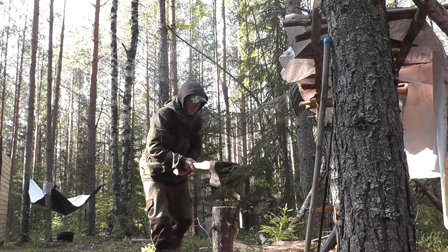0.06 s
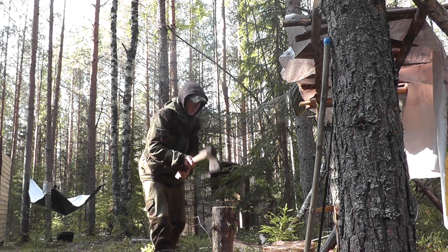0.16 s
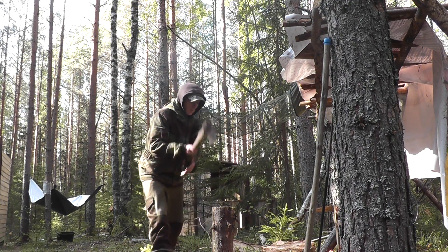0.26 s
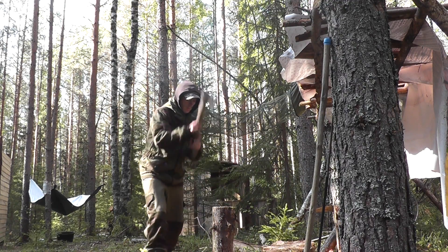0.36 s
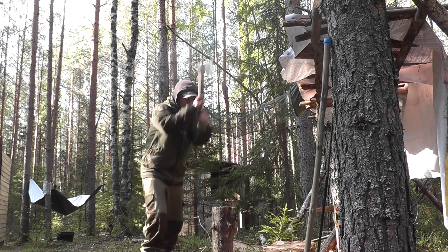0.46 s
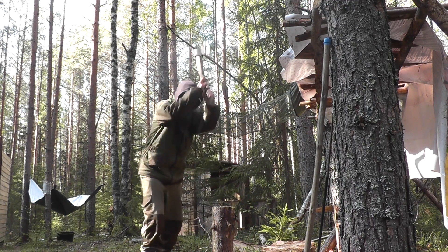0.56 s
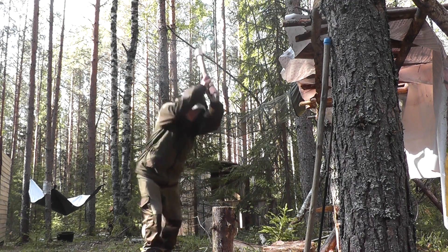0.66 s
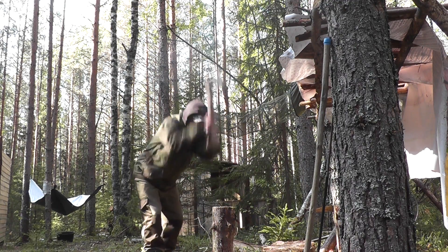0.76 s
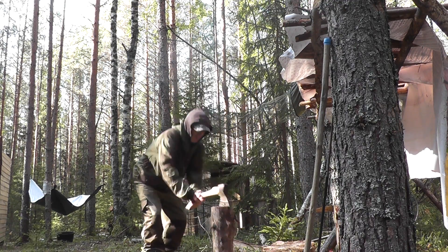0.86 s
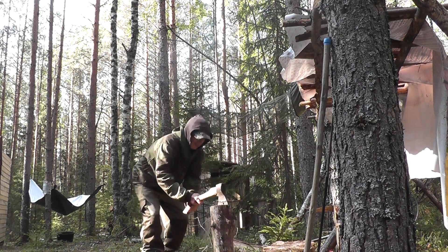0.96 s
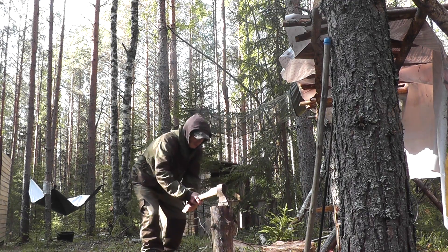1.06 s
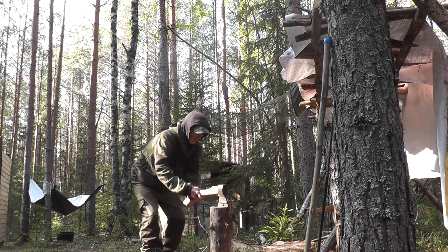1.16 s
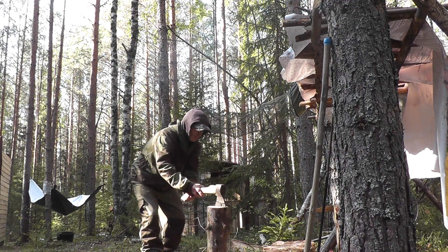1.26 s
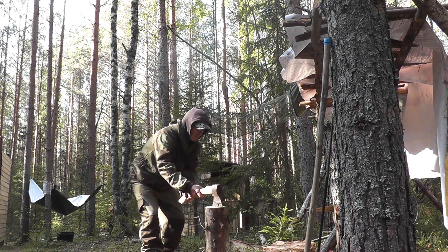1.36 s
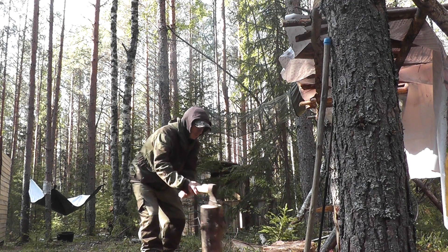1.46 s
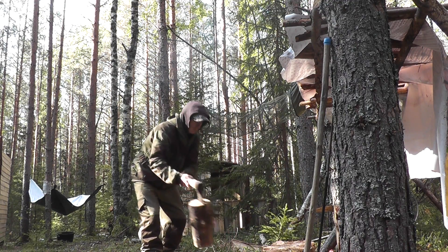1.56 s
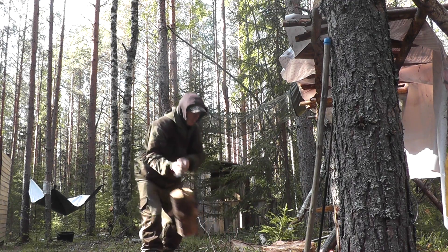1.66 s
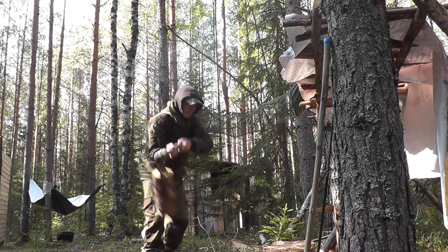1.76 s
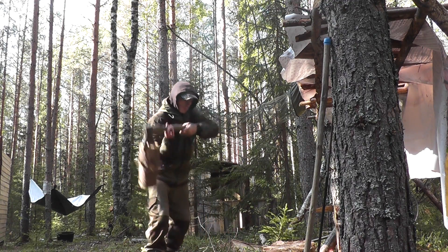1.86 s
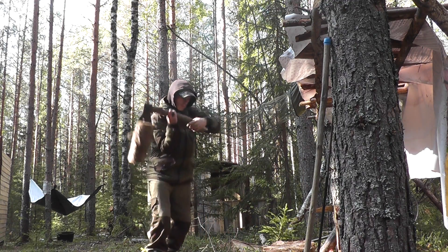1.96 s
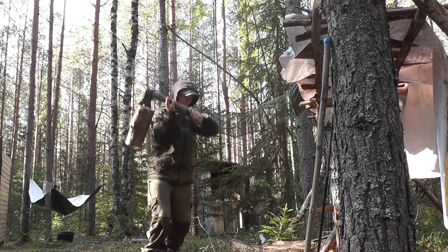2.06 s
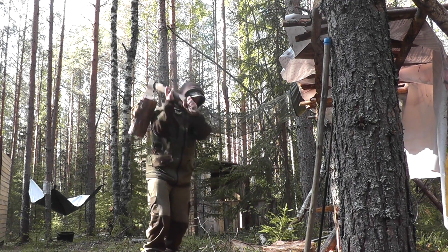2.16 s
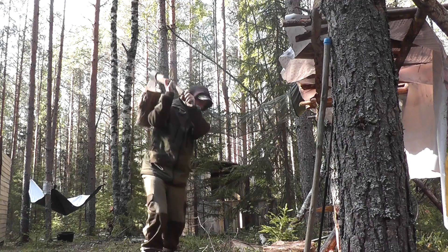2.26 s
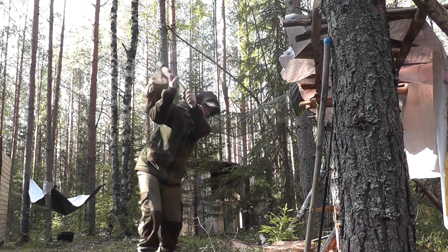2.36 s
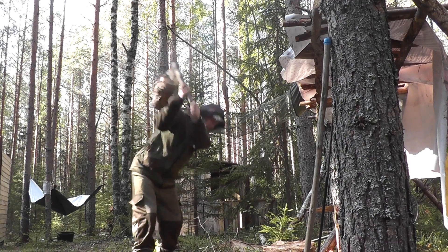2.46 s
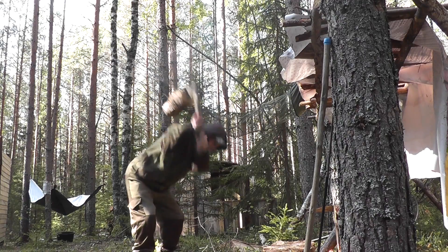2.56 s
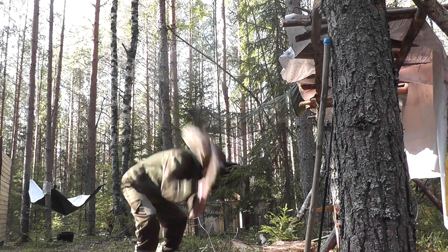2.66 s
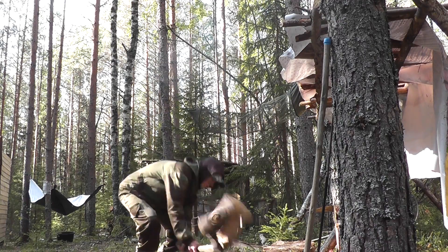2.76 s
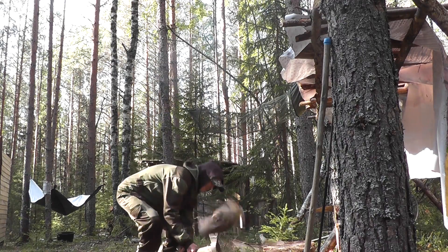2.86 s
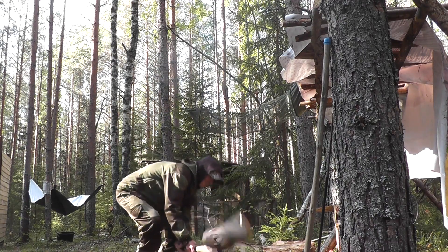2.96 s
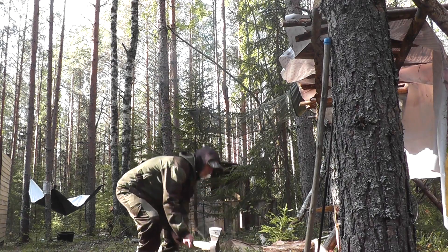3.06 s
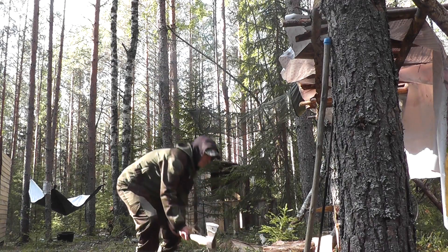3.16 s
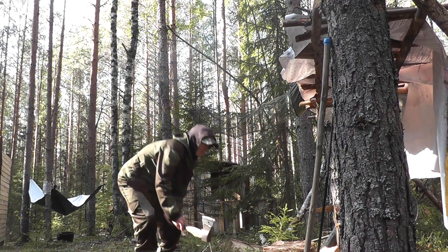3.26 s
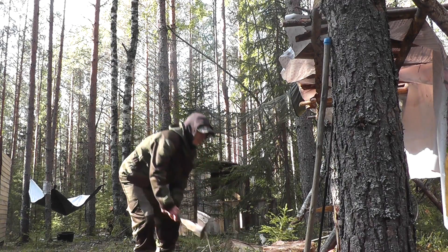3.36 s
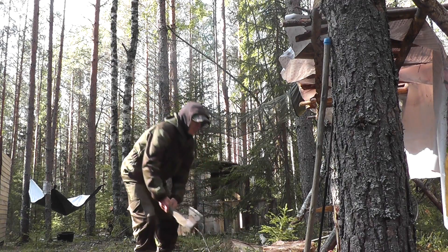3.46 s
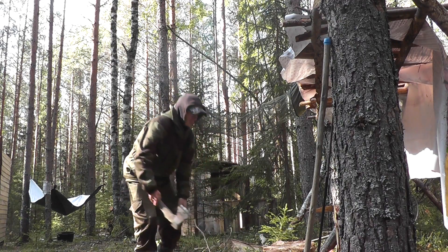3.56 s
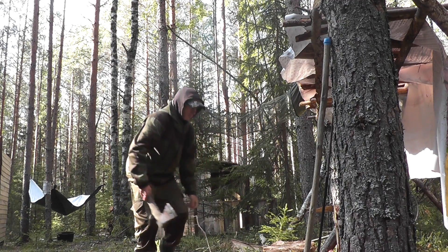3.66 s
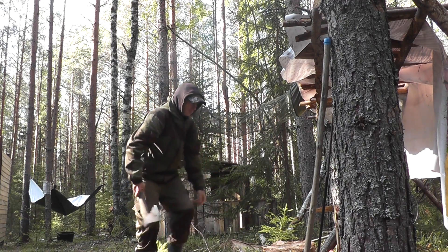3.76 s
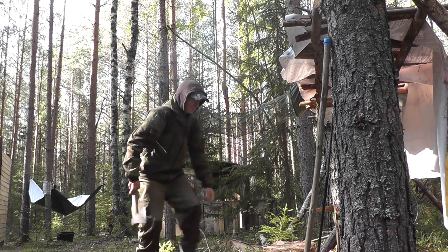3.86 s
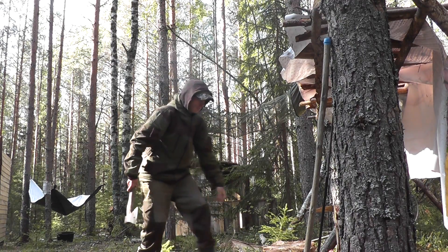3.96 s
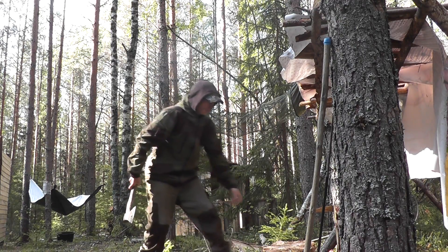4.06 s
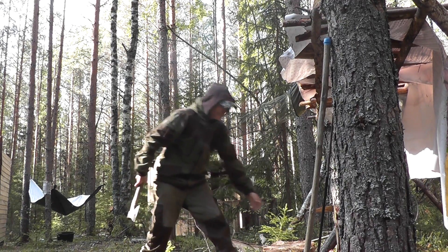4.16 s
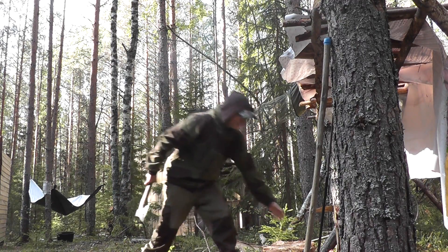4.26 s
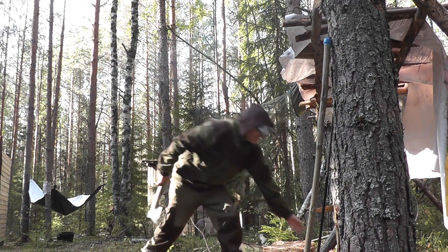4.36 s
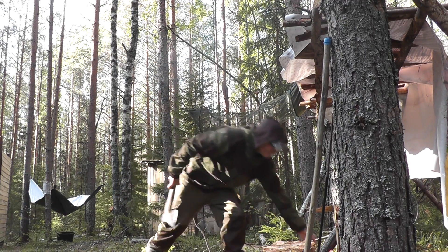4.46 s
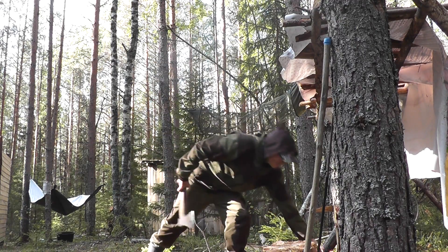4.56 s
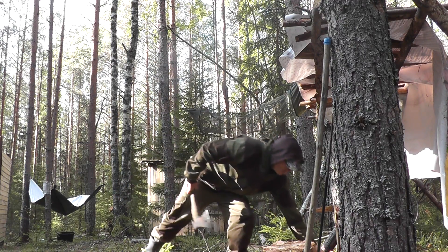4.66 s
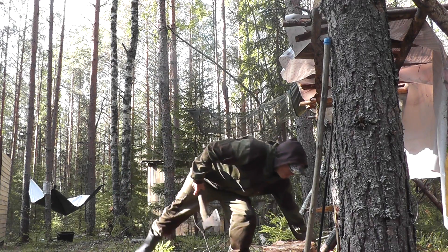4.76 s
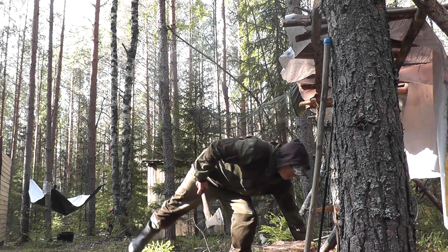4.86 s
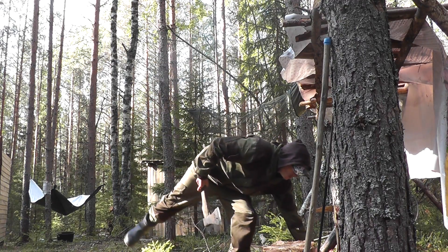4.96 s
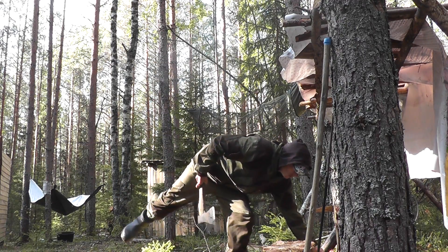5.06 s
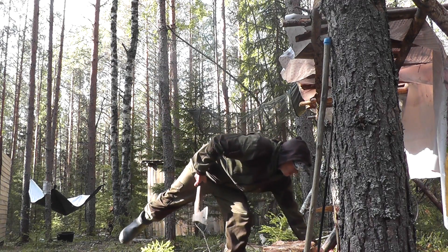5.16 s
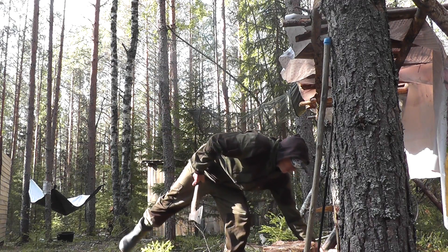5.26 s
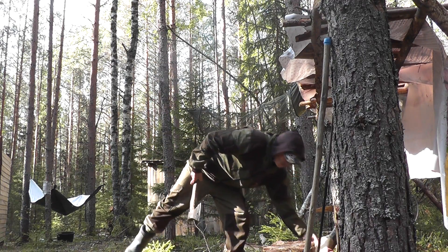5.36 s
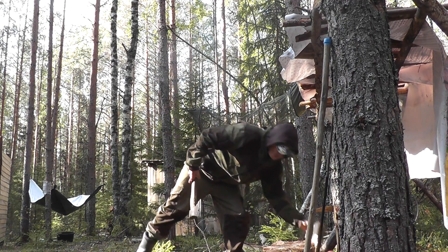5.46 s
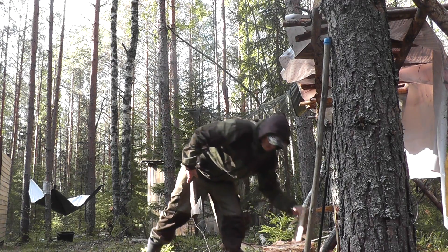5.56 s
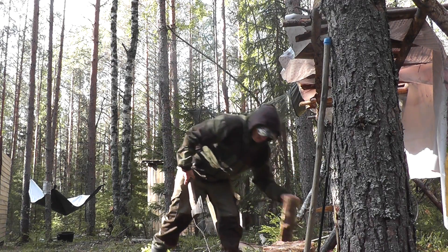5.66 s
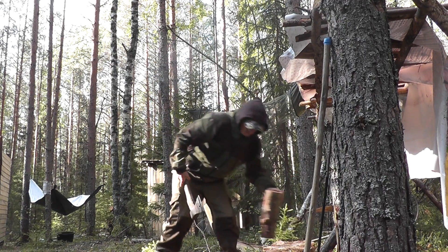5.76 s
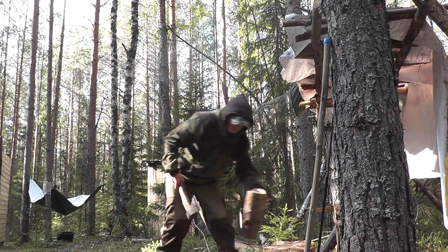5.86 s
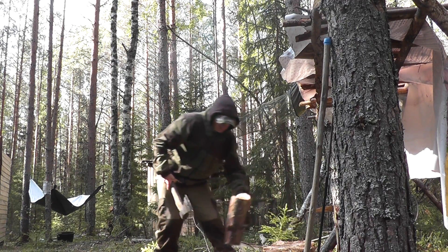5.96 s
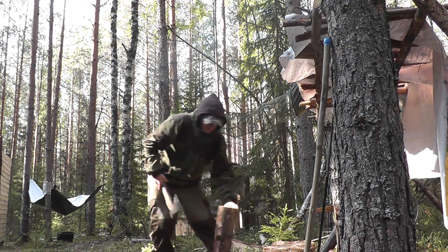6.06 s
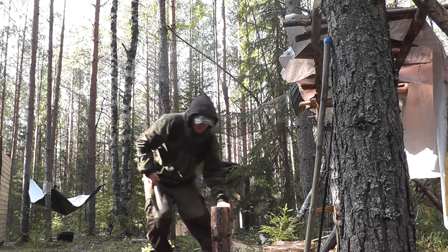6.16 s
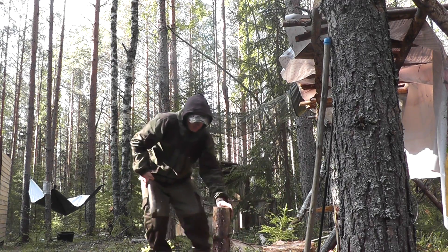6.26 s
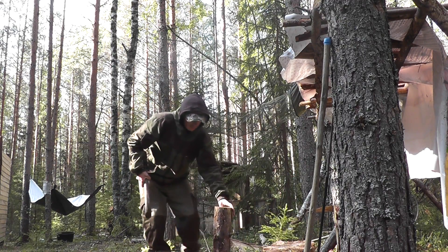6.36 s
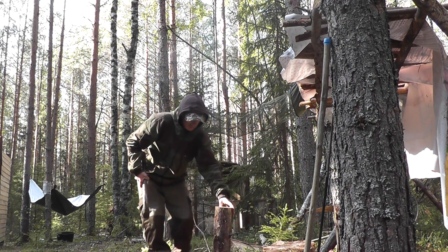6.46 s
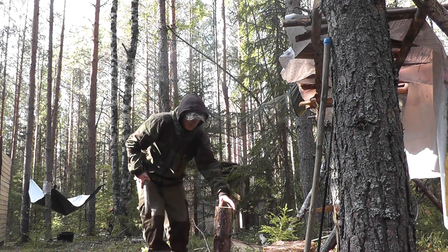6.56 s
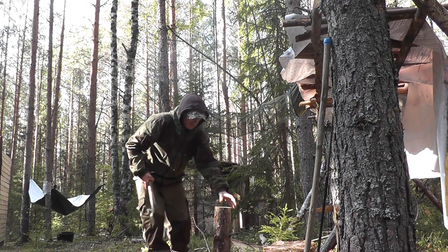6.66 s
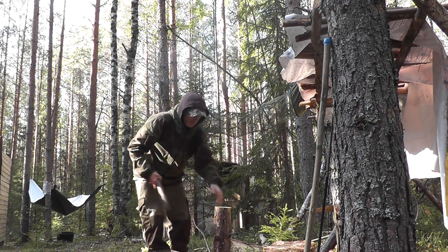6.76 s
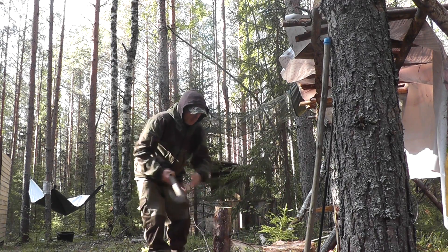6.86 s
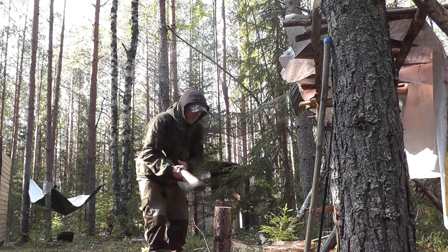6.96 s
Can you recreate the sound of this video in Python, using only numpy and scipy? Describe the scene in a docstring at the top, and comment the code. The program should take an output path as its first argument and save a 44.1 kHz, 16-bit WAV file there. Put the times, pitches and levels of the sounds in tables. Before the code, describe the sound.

Firewood is split close to a stereo microphone in a forest, over a quiet hush of treetops. A jacket rustles and boots bump softly, then at 0.9 seconds a hatchet bites into a log with a loud, sharp crack and thud that echoes among the trunks. Cloth swishes again and a bird chirps faintly. At 2.8 seconds a second loud blow brings log and hatchet down on the stump. The wood rips slowly apart, splinters patter and the halves tumble to the ground with several knocks until about 3.4 seconds. Another dull wooden thump comes at 3.9 seconds, followed by soft steps and small twig snaps. A faint, distant bird warbles from 4.3 to 5.5 seconds, then three thin high notes follow. At 6.1 seconds the next piece is set on the stump with a light knock, and soft bumps and jacket rustle continue to around 7 seconds.

```python
"""Splitting firewood in a pine forest, in stereo, the work close to the microphone and the trees all around.
Over quiet air a jacket rustles and boots bump on the litter. At 0.9 s the hatchet bites into a log; a bird
chirps. At 2.8 s log and hatchet come down on the stump together: the wood rips slowly apart, splinters
patter and the halves tumble to the ground. A far warbler sings, a thin call follows, and at 6.1 s the
worker stands the next piece on the stump. The trunks scatter every blow back."""
import sys
import numpy as np
from scipy import signal
from scipy.fft import rfft, irfft
from scipy.io import wavfile
from scipy.ndimage import uniform_filter1d

SR = 44100
rng = np.random.default_rng(int(sys.argv[2]) if len(sys.argv) > 2 else 0)


def master(y):
    """Save y as 16-bit WAV."""
    cut = np.clip(np.atleast_2d(y).T, -1, 1)
    pcm = np.round(cut * 32767)  # scale
    wavfile.write(sys.argv[1], SR, pcm.astype(np.int16))


N = 309141
TIME = np.arange(N) / SR
HIT = TIME[:8192]  # time axis of one contact

# spectra at the microphone: f/Hz, level/dB
AIR_SPECTRUM = [(20, -20), (55, 2), (150, 0), (500, 0), (780, -3.5), (1100, -9.5), (2000, -14), (3500, -16),
                (6500, -17), (10000, -18.5), (15000, -20)]  # hush of the treetops
CLOTH_SPECTRUM = [(40, -10), (180, 2), (700, 0.5), (1400, -6), (2500, -12), (6000, -12), (10000, -21),
                  (15000, -25.5)]  # sliding jacket
TWIG_SPECTRUM = [(100, -20.5), (500, 0), (1500, 1.5), (3000, 1.5), (7000, 2.5), (10000, -3), (15000, -16)]  # tiny dry fractures
CRACK_SPECTRUM = [(60, 0), (300, -3.5), (480, 3), (800, -0.5), (1500, 0), (2500, -2.5), (4000, -3.5),
                  (7000, 0), (11000, -0.5), (15000, -8)]  # fibres breaking at the blade
LOG_SPECTRUM = [(100, -6.5), (250, 3.5), (500, -4.5), (900, -1.5), (1500, -4), (2200, -12), (3100, -12.5),
                (5000, -24.5), (15000, -37.5)]  # dense modes of the log
CLACK_SPECTRUM = [(100, -20.5), (800, -10), (1350, 0), (1800, 0), (2400, -18), (3500, -29), (16000, -46)]  # hard faces meeting
# stereo width of sound from all around: f/Hz, side level/dB
WIDTH = [(60, 1.5), (300, 3), (600, -1.5), (1200, -1), (2300, -3.5), (4500, -27.5), (8000, -9.5),
         (13000, -4.5)]
# movements that slide the jacket: t at the fastest/s, level/dB, rise/s, flap against hiss/dB
MOVEMENTS = [(0.103, -59.5, 0.3, 1), (0.41, -55, 0.081, 1), (0.561, -51, 0.063, -1), (.93, -57.5, 0.097, 0),
             (2.0, -57.5, 0.093, -2.5), (2.368, -51.5, 0.063, -8.5), (2.55, -60, 0.084, -4.5),
             (3.902, -50.5, 0.036, 6.5), (4.25, -61.5, 0.46, -1), (5.41, -64, 0.04, -7),
             (5.82, -64.5, 0.068, 5.5), (6.213, -58, .09, 4), (6.502, -56, 0.092, 3),
             (6.938, -53.5, 0.05, 0)]
# the row at 2.85 s is wood ripping slowly after the second blow, the others are showers of bark and
# needles: t/s, level/dB, time to peak/s, tilt/(dB/octave)
CRACKLE_SWELLS = [(1.212, -50, 0.02, 2), (1.241, -59.5, 0.052, 2.5), (2.85, -35.5, 0.039, -5.5),
                  (2.891, -37.5, 0.026, -0.5), (3.01, -44.5, 0.028, -3), (3.155, -40, .02, 4.5),
                  (3.23, -45, 0.025, 1), (3.32, -53, 0.069, 0), (4.722, -59.5, 0.025, 6),
                  (6.42, -58, 0.047, 4)]
# soft bumps of boots and of wood in the hand: t/s, thump/dB, thump f/Hz, hardness/Hz
BUMPS = [(0.13, -40.5, 270, 480), (0.24, -49, 330, 600), (0.3983, -49, 241, 1480), (2.759, -43, 240, 550),
         (3.378, -44.5, 300, 1390), (3.851, -43, 350, 400), (3.864, -37, 350, 380),
         (3.933, -33.5, 101, 330), (4.135, -40.5, 139, 650), (4.257, -45.5, 200, 800),
         (4.351, -47.5, 220, 500), (5.238, -49, 190, 550), (5.803, -43, 200, 750),
         (5.822, -44.5, 189.4, 600), (6.402, -44.5, 300, 810), (6.42, -45.5, 230, 750),
         (6.493, -43, 310, 400), (6.541, -42, 199, 500), (6.577, -44.5, 170, 420)]
# modes of a split piece, and of the log on the stump: f/Hz, level/dB, t60/s
BILLET_MODES = [(314, -5, 0.19), (391, -4, 0.079), (472, -1.5, 0.087), (660, -12, 0.08),
                (730, -15.5, 0.013), (944, -8.5, 0.12), (1196, -9.5, 0.057), (1360, -5, 0.092),
                (1436, -14, 0.017), (1762, -5, 0.012)]
LOG_MODES = [(224, 4, 0.062), (315, -5.5, 0.046), (398, -4.5, 0.017), (496, 3.5, 0.03), (690, -3, 0.052),
             (938, -3, 0.065), (1210, -4.5, 0.024), (1420, -6.5, 0.027)]
# hatchet blows: t/s, crack/dB, crack length/s, wood/dB, mode pitch factor, wood tilt/(dB/octave),
# hardness/Hz, thud/dB, thud f/Hz, thud delay/s
CHOPS = [(0.9296, -9.5, 0.0055, -17.5, 1.0, 1.5, 2978, -15, 121.4, 0.01106),
         (2.8215, -11.5, 0.011, -18.5, 1.02, -0.5, 1100, -18.5, 103.7, .0055)]
# twigs and chips snapping: t/s, level/dB, tilt/(dB/octave)
SNAPS = [(1.228, -41.5, -1), (1.979, -51, -3), (2.656, -54, 2), (2.955, -31, 1), (2.99, -35, 4),
         (3.016, -31, -2.5), (3.187, -35, 14), (3.2, -27, 2), (3.318, -40, 7), (3.348, -38.5, 7),
         (3.385, -43, -3), (3.669, -40, 9.5), (3.9037, -33.5, -1), (4.142, -48, -4), (5.053, -54, -0.5),
         (5.236, -59, 2), (6.1411, -46, 8), (6.331, -52, 4.5)]
# single chirps: t/s, length/s, f/Hz, level/dB, starting offset and waver as shares of the pitch
CHIRPS = [(2.40, .06, 7100, -66, -0.064, .008), (4.366, 0.037, 2750, -61, .25, .019),
          (5.393, 0.034, 2170, -58.5, 0.102, 0.064)]
# the halves tearing apart: t/s, crack/dB, crack decay/s, ring/dB, mode pitch factor
TEARS = [(2.9245, -22.5, 0.0098, -17, 0.91), (2.93, -19.5, 0.013, -29, 1.28),
         (3.1108, -32.5, 0.013, -59, 0.84), (3.1461, -24, 0.0053, -31, 2.5),
         (3.157, -20.5, 0.0095, -23.5, 1.02), (3.175, -19.5, 0.0067, -22.5, 1.17)]
# firewood landing on ground or stump: t/s, thump/dB, thump f/Hz, ring/dB, mode pitch factor,
# hardness/Hz, ring time factor, clack/dB
LANDINGS = [(2.932, -11.5, 183, -27, 0.55, 1200, 0.4, -33), (3.057, -27.5, 380, -36, 1.01, 600, 0.76, -54),
            (3.183, -22.5, 139, -25, 1.3, 900, 0.45, -30), (3.1993, -7, 261, -16, 0.98, 1150, 0.64, -14),
            (3.268, -26.5, 192, -30, 0.8, 700, .8, -39), (3.2773, -17, 317, -20.5, 1.0, 900, 0.71, -17),
            (3.409, -28, 254, -45, 0.97, 700, 1, -55), (3.9051, -18.5, 185.3, -30.5, 0.82, 600, .7, -42),
            (6.1409, -39.5, 113, -31, 1.51, 900, 0.34, -47), (6.147, -37.5, 230, -37, 1.45, 675, 0.26, -59)]
# scatter from the trunks: f/Hz, near level/dB, near t60/s, far level/dB, far t60/s, side level/dB
TRUNK_SCATTER = [(50, -0.5, 0.96, -27, 1.1, -14.5), (125, -5.5, 0.44, -22.5, 1, -10.5),
                 (284, -8.5, 0.26, -27.5, 1.5, -11), (600, -6.5, 0.3, -11.5, 1.3, -5),
                 (1490, -11, 0.61, -14.5, 2, -5), (3520, -16, .4, -12, 0.82, -10.5),
                 (6700, -17.5, 0.48, -19, 1.2, -14.5), (12000, -25.5, .3, -33.5, .7, -7.5)]
# microphone response: f/Hz, level/dB
MIC_RESPONSE = [(850, 1), (1000, -7), (1150, 0.5), (1700, -1.5), (2200, -8.5), (3100, -1), (3900, -0.5),
                (4500, -7), (5300, 0), (8700, 0.5), (11000, -6), (15500, -6)]


def amp(db):
    """Decibels to gain."""
    return 10 ** (np.asarray(db) / 20)


def unit_rms(x):
    """Scales to rms 1."""
    return x / np.sqrt(np.mean(x ** 2) + 1e-20)


def read(points, hz):
    """Reads a spectrum on a log-frequency axis."""
    f, value = np.transpose(points)
    return np.interp(np.log(hz + 1), np.log(f + 1), value)


def add(mix, s, sound):
    """Mixes a sound in at time s."""
    part = mix[:, round(s * SR):][:, :sound.shape[-1]]
    part += sound[..., :part.shape[1]]


def colour(x, points, tilt=0):
    """Shapes a steady signal by a spectrum and a treble tilt in dB per octave."""
    hz = np.fft.rfftfreq(x.shape[-1], 1 / SR)
    return irfft(rfft(x) * amp(read(points, hz) + tilt * np.log2(1 + hz / 500)), x.shape[-1])


def spread(pair, width, side_db=0):
    """Two unrelated signals, taken as mid and side, become left and right."""
    side = amp(side_db) * colour(pair[1], width)
    return np.array([pair[0] + side, pair[0] - side])


def grains(points, size, grain_db, side_db, tilt=0):
    """Dense clicks of uneven strength, with a given spectrum, in stereo."""
    clicks = rng.standard_normal((2, size)) * amp(grain_db * np.clip(rng.standard_normal(size), -3, 3))
    return unit_rms(colour(spread(clicks, WIDTH, side_db), points, tilt))


def flutter(depth_db, size):
    """A random gain that changes over about size samples."""
    drift = unit_rms(uniform_filter1d(rng.standard_normal(N), size))
    return amp(depth_db * np.clip(drift, -2.5, 2.5))


def air():
    """The treetops overhead: a wide hush whose level drifts a little."""
    return amp(-59) * grains(AIR_SPECTRUM, N, grain_db=2, side_db=1.3) * flutter(depth_db=-1, size=9000)


def jacket(flap_hz=600, rest_db=-67.5):
    """Cloth, never quite still, flaps low and hisses high in one soft swell for each movement."""
    cloth = unit_rms(grains(CLOTH_SPECTRUM, N, grain_db=1, side_db=-9) * flutter(depth_db=2, size=500))
    flap = signal.sosfiltfilt(signal.butter(2, flap_hz, fs=SR, output="sos"), cloth)
    hiss_power = flap_power = amp(rest_db) ** 2
    for s, db, rise, flap_db in MOVEMENTS:
        span = np.where(TIME < s, rise, 0.78 * rise)  # stops faster than it starts
        swell = np.exp(-((TIME - s) / span) ** 2)
        hiss_power = hiss_power + amp(db) ** 2 * swell
        flap_power = flap_power + amp(db + flap_db) ** 2 * swell
    return np.sqrt(hiss_power) * (cloth - flap) + np.sqrt(flap_power) * flap


def litter_and_rip(rest_db=-76.5):
    """Litter shifts underfoot; showers of bark and needles and the log's slow rip swell and trail off."""
    out = amp(rest_db) * grains(TWIG_SPECTRUM, N, grain_db=1, side_db=-6.5)
    for s, db, rise, tilt in CRACKLE_SWELLS:
        age = TIME[:SR] / rise
        crackling = grains(TWIG_SPECTRUM, SR, grain_db=3, side_db=-6, tilt=tilt)
        add(out, s, amp(db) * age * np.exp(1 - age) * crackling)
    return out * unit_rms(flutter(depth_db=3, size=80))


def thump(hz, cycles):
    """A heavy push into soft ground that swells for part of a cycle and dies in a few."""
    turns = hz * HIT
    return np.sin(2 * np.pi * turns) * 2 * turns / cycles * np.exp(-turns / cycles)


def ring(modes, pitch, hard_hz, sustain=1):
    """Wood modes; a soft contact leaves the high ones out, and the ground shortens them all."""
    out = np.zeros(len(HIT))
    for k, (hz, db, t60) in enumerate(modes):
        envelope = amp(db - 60 * HIT / (t60 * sustain)) / np.hypot(1, (hz * pitch / hard_hz) ** 2)
        out += (-1) ** k * envelope * np.sin(2 * np.pi * hz * pitch * HIT)
    return out


def knock(thump_db, hz, ring_db, pitch, hard_hz, sustain):
    """A contact just right of centre thumps, rings the piece and scuffs its rough face."""
    spectrum = [(30, -30), (130, -8), (hard_hz / 2, 0), (hard_hz, -3), (hard_hz * 2, -24), (16000, -45)]
    scuff = amp(-5.5) * np.exp(-HIT / 0.0074) * grains(spectrum, len(HIT), grain_db=1.5, side_db=-10)
    wood = ring(BILLET_MODES, pitch, hard_hz, sustain) + scuff
    return (amp(thump_db) * thump(hz, cycles=0.65) + amp(ring_db) * wood) * amp([[-0.6], [0.6]])


def firmness(hard_hz):
    """How many dB more a contact of this hardness rings and crunches."""
    return 9.5 * np.log2(hard_hz / 710)


def bumps():
    """Boots and handled wood bump softly, each with a damped ring."""
    out = np.zeros((2, N))
    for s, db, hz, hard_hz in BUMPS:
        ring_db = db - 4 + firmness(hard_hz)
        add(out, s, knock(db, hz, ring_db, pitch=1.2, hard_hz=hard_hz, sustain=0.35))
    return out


def crackle(db, decay_s, tilt):
    """A short cluster of tiny fractures."""
    fractures = grains(TWIG_SPECTRUM, len(HIT), grain_db=1.5, side_db=-8.5, tilt=tilt)
    return amp(db) * np.exp(-HIT / decay_s) * fractures


def snaps():
    """Each bump crunches a little, twigs snap, and fibres tear between the halves."""
    out = np.zeros((2, N))
    for s, db, _, hard_hz in BUMPS:
        add(out, s, crackle(db - 14 + min(firmness(hard_hz), 0), decay_s=0.012, tilt=-3))
    for s, db, tilt in SNAPS:
        add(out, s, crackle(db, decay_s=0.0033, tilt=tilt))
    for s, db, decay_s, *_ in TEARS:
        add(out, s, crackle(db, decay_s, tilt=-4))
    return out


def chops():
    """The blade breaks a rush of fibres, the log rings, and the stump is driven into the soil."""
    out = np.zeros((2, N))
    for s, crack_db, length, wood_db, pitch, tilt, hard_hz, thud_db, thud_hz, delay in CHOPS:
        decay = np.exp(-(HIT / length) ** 2) + amp(-16) * np.exp(-HIT / 0.008)
        burst = (1 - np.exp(-HIT / 0.00026)) * decay
        fibres = grains(CRACK_SPECTRUM, len(HIT), grain_db=3.5, side_db=-3.5)
        add(out, s, amp(crack_db) * burst * fibres)
        dense_modes = grains(LOG_SPECTRUM, len(HIT), grain_db=2, side_db=-3, tilt=tilt)
        log = ring(LOG_MODES, pitch, hard_hz) + amp(4) * np.exp(-HIT / 0.01) * dense_modes
        add(out, s + 0.003, amp(wood_db) * log * (1 - np.exp(-HIT / 0.0013)))
        add(out, s + delay, amp(thud_db) * thump(thud_hz, cycles=0.47) * amp([[-1.5], [1.5]]))
    return out


def whistle(length, hz, db, slide, warble):
    """A bird's thin note slides into its pitch and warbles."""
    t = TIME[:round(length * SR)]
    waver, tremble = unit_rms(uniform_filter1d(rng.standard_normal((2, len(HIT))), 150))[:, :len(t)]
    pitch_hz = hz * (1 + slide * np.exp(-t / 0.0097) + warble * waver)
    envelope = amp(db + 2.1 * tremble) * np.sin(np.pi * t / length)
    return envelope * np.sin(2 * np.pi * np.cumsum(pitch_hz) / SR)


def chirps():
    """Small birds whistle single notes off in the trees."""
    out = np.zeros((2, N))
    for s, *note in CHIRPS:
        add(out, s, whistle(*note))
    return out


def splinters(count=16, start_s=2.86, span_s=0.65):
    """Splinters tick onto the litter at chance moments, fewer and fainter with time."""
    out = np.zeros((2, N))
    for when, smallness in rng.random((count, 2)):
        tick = crackle(-36 - 14 * when - 8 * smallness, decay_s=0.001, tilt=5)
        add(out, start_s + span_s * when ** 1.3, tick)
    return out


def tear_jolts():
    """Each tear jolts the parting halves and rings them."""
    out = np.zeros((2, N))
    for s, _, _, db, pitch in TEARS:
        jolt = knock(thump_db=-16, hz=350, ring_db=0.5, pitch=pitch, hard_hz=2700, sustain=0.43)
        add(out, s + 0.00101, amp(db) * jolt)
    return out


def landings():
    """Firewood knocks on the ground or the stump, with a clack where hard faces meet."""
    out = np.zeros((2, N))
    envelope = (1 - np.exp(-HIT / 0.00086)) * np.exp(-HIT / 0.0035)
    for s, *contact, clack_db in LANDINGS:
        clack = amp(clack_db) * envelope * grains(CLACK_SPECTRUM, len(HIT), grain_db=2, side_db=-15)
        add(out, s, knock(*contact) + clack)
    return out


def warbler(count=13, start_s=4.3, span_s=1.2):
    """Far off, a run of wavering notes hops around one slow arch of pitch."""
    out = np.zeros((2, N))
    for k, (hop, lag, slide) in enumerate(rng.uniform(-1, 1, (count, 3))):
        octaves = 0.2 * (hop + np.sin(np.pi * (k / count) ** 2))
        note = whistle(length=0.11, hz=3480 * 2 ** octaves, db=-72, slide=0.052 * slide, warble=0.018)
        add(out, start_s + (k + 0.3 * lag) * span_s / count, note)
    return out


def thin_call(count=3, start_s=5.525, step_s=0.108):
    """A bird's high notes at an even pace, each louder and a little higher than the last."""
    out = np.zeros((2, N))
    for k in range(count):
        note = whistle(length=0.064, hz=7200 + 65 * k, db=-66 + 2 * k, slide=-0.0603, warble=0.012)
        add(out, start_s + k * step_s, note)
    return out


def forest(x):
    """Near trunks return a quick dense tail, the deep forest a long faint one."""
    table = np.array(TRUNK_SCATTER)
    noise = spread(rng.standard_normal((2, 2 * SR)), table[:, [0, -1]])
    hz, t, spectra = signal.stft(noise, SR, nperseg=512)
    near_db, near_t60, far_db, far_t60 = (read(table[:, [0, k]], hz)[:, None] for k in range(1, 5))
    power = sum(amp(db - 60 * t / t60) ** 2 * np.log(10 ** 6) / (t60 * SR)  # db sets the total energy
                for db, t60 in [(near_db, near_t60), (far_db, far_t60)])
    tail = signal.istft(spectra * np.sqrt(power), SR, nperseg=512)[1]
    tail *= 1 - np.exp(-(TIME[:tail.shape[1]] / 0.014) ** 2)  # the first trunks stand a few metres off
    return signal.fftconvolve(x.mean(0)[None], tail, axes=1)[:, :N]


def echoes(soft, directions=4):
    """Breaking wood sends a different crack to each stand of trees; softer sounds go to all alike."""
    return sum(forest(chops() + amp(-3) * snaps() + soft) for _ in range(directions)) / np.sqrt(directions)


def boom(x, delay_s, hz, db):
    """The low part of each thud comes back once more from across the clearing."""
    out = np.zeros((2, N))
    low_band = signal.butter(2, [hz * 0.84, hz * 1.33], "band", fs=SR, output="sos")
    add(out, delay_s, amp(db) * signal.sosfilt(low_band, x))
    return out


def scene():
    """At the microphone: close work, its echoes and the air. Ground sounds echo least, birds most."""
    rustle_and_rip = jacket() + litter_and_rip()
    wood = bumps() + tear_jolts() + landings()
    blows = chops()
    birds = chirps() + warbler() + thin_call()
    direct = rustle_and_rip + wood + snaps() + blows + amp(-2) * birds + splinters()
    scattered = echoes(amp(-1.5) * rustle_and_rip + amp(-6) * wood + amp(6) * birds)
    low_echo = boom(blows + amp(-5.5) * wood, delay_s=0.072, hz=130, db=-10.5)
    return air() + direct + scattered + low_echo


def record(dry):
    """The microphone's colour and bass cut, a soft overload on the hardest peaks, then the band limit."""
    taps, bass_hz, ceiling, edge_hz = 2048, 45, 0.8, 15900
    log_gain = np.log(amp(read(MIC_RESPONSE, abs(np.fft.fftfreq(2 * taps, 1 / SR)))))
    mic = np.fft.ifft(np.exp(np.conj(signal.hilbert(log_gain)))).real[:taps]  # minimum phase
    heard = signal.oaconvolve(dry, mic[None], axes=1)[:, :N]
    heard = signal.sosfilt(signal.butter(2, bass_hz, "high", fs=SR, output="sos"), heard)
    heard = ceiling * np.tanh(heard / ceiling)
    band_limit = signal.firwin(401, edge_hz, window=("kaiser", 9), fs=SR)
    return signal.oaconvolve(heard, band_limit[None], "same")


dry = scene()
out = record(dry)
master(out)
```